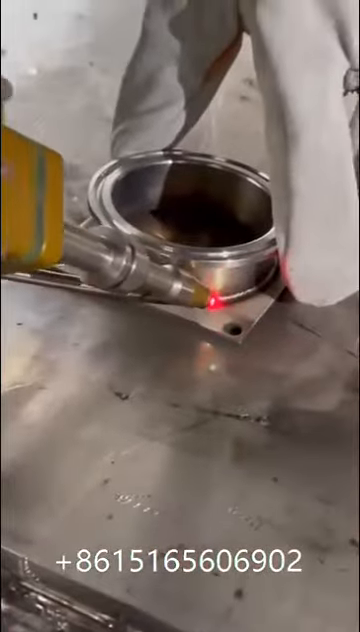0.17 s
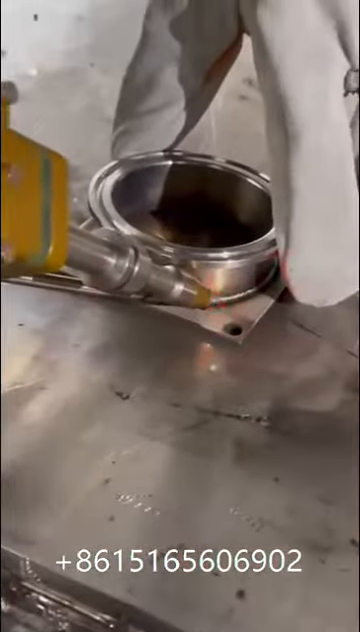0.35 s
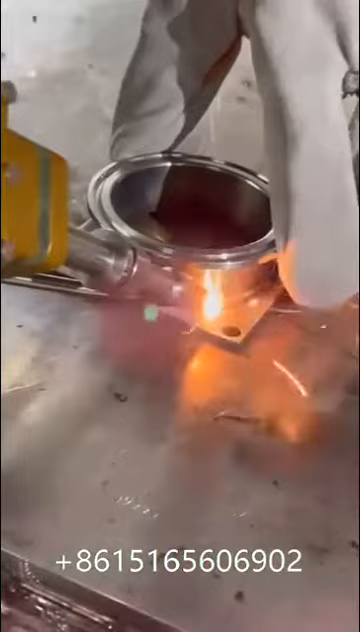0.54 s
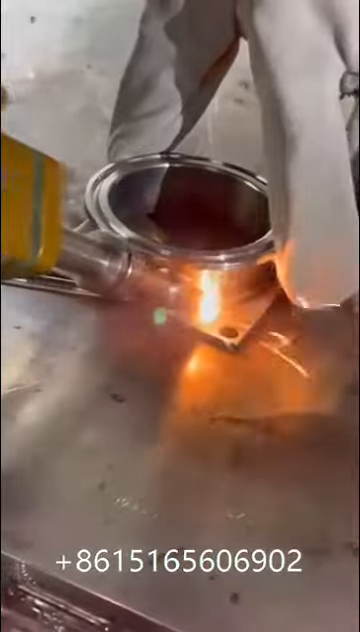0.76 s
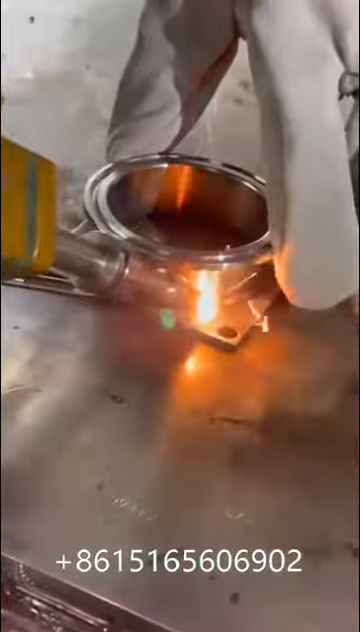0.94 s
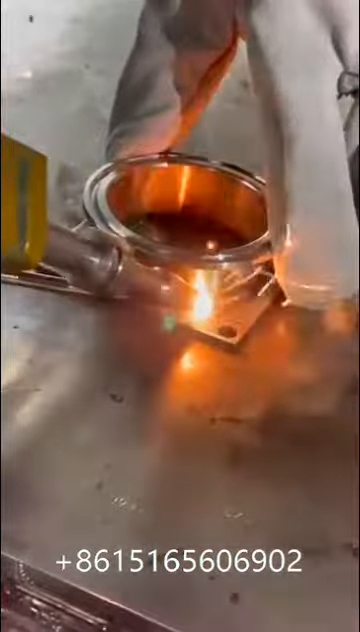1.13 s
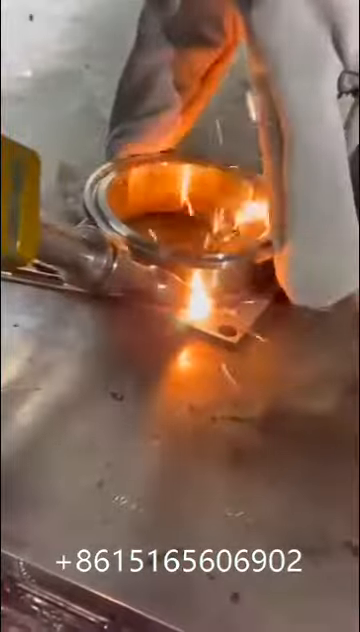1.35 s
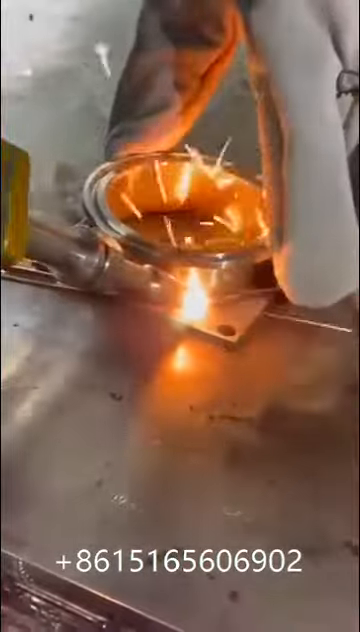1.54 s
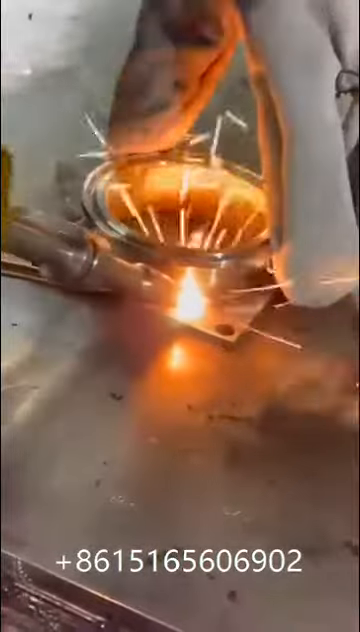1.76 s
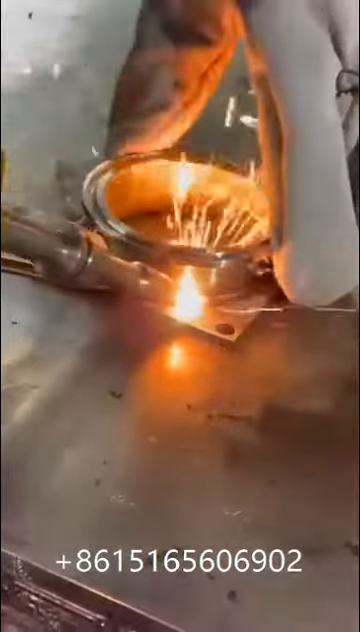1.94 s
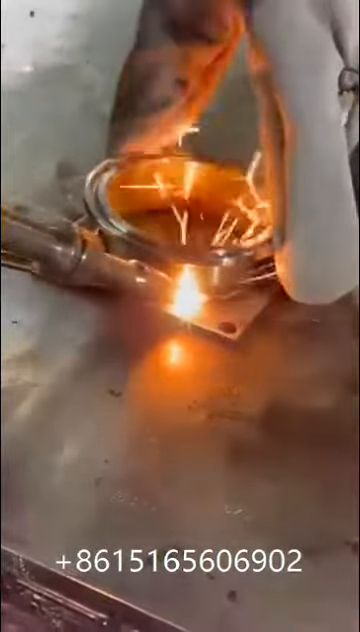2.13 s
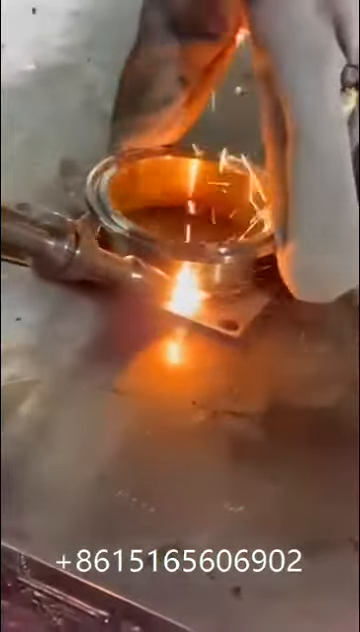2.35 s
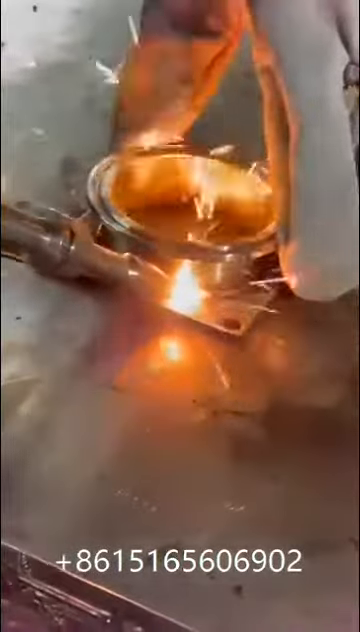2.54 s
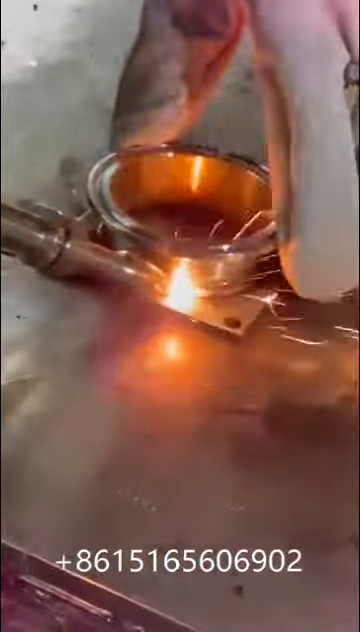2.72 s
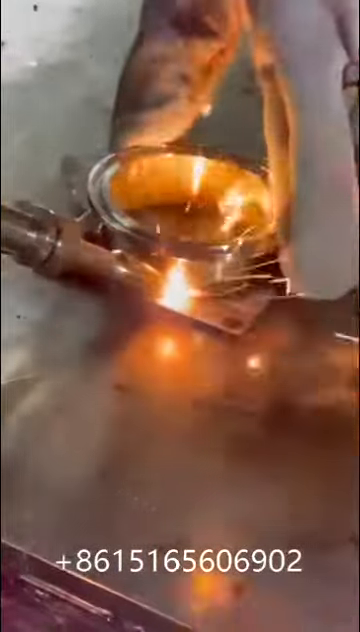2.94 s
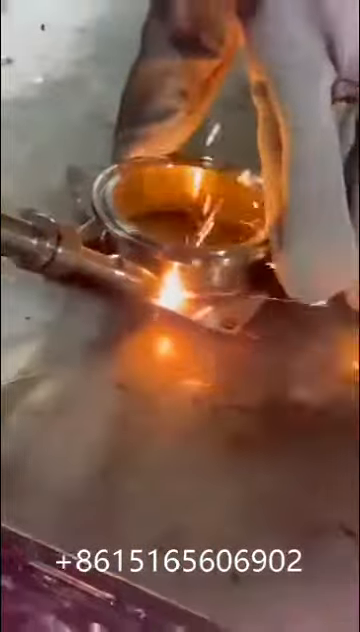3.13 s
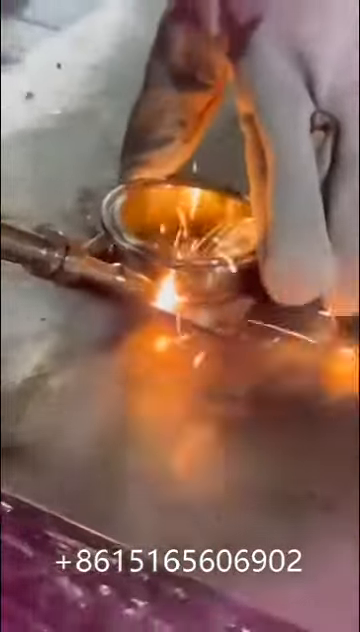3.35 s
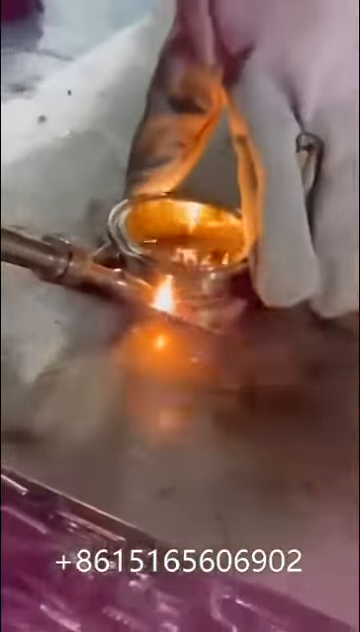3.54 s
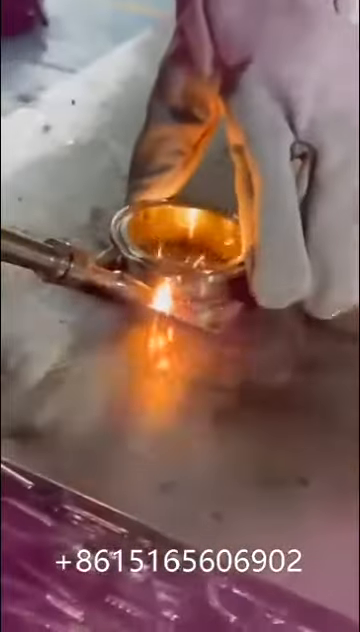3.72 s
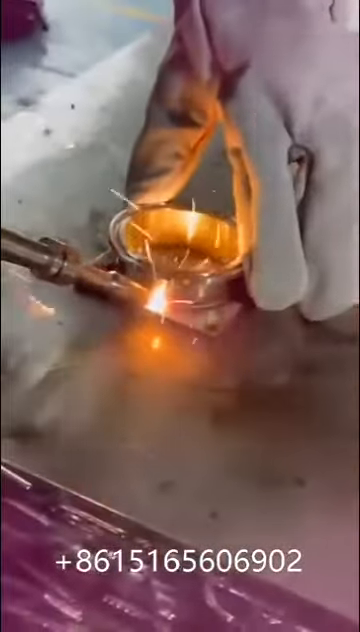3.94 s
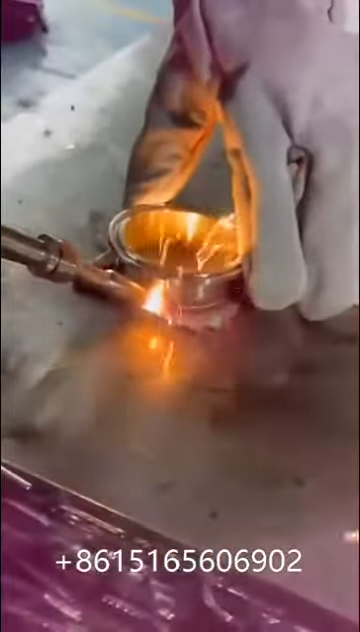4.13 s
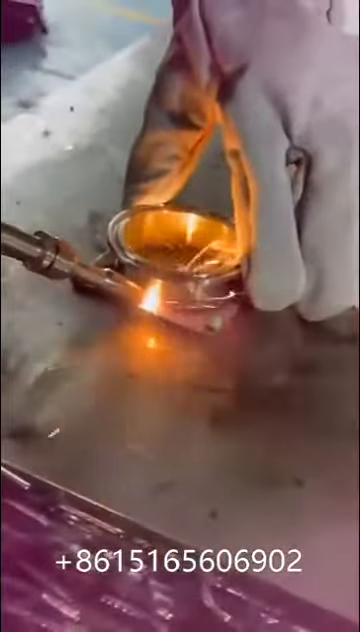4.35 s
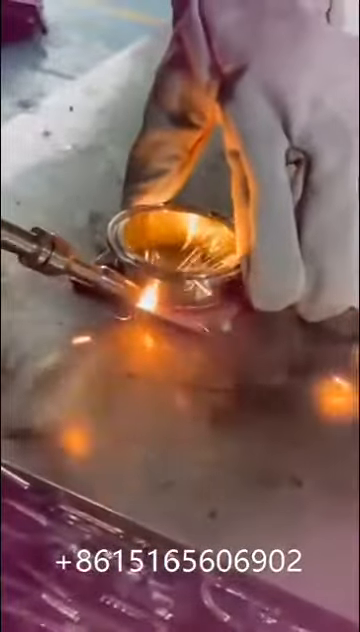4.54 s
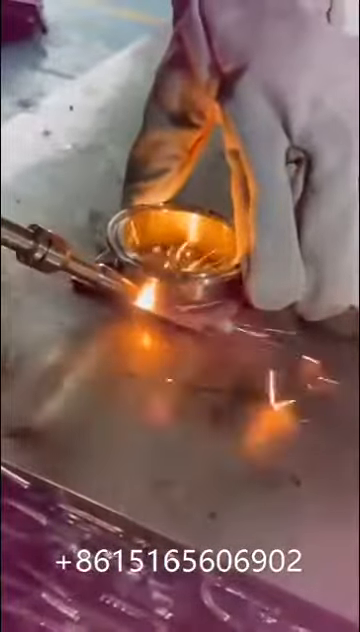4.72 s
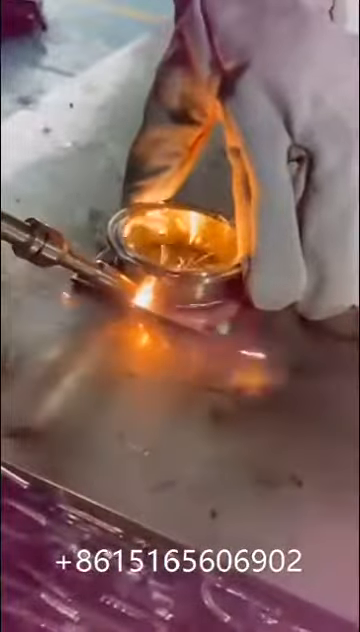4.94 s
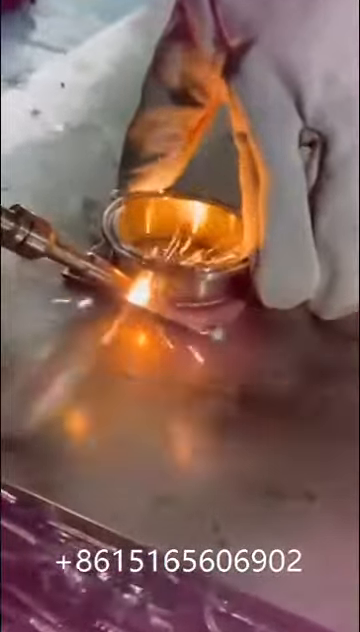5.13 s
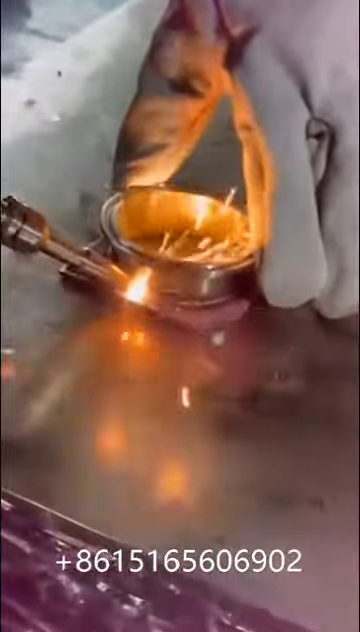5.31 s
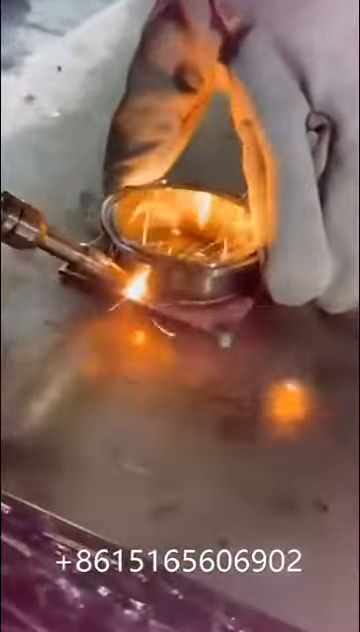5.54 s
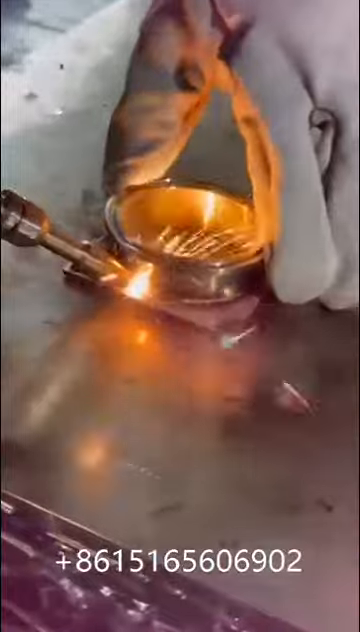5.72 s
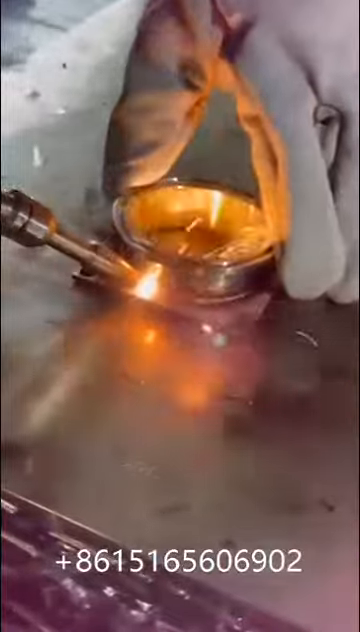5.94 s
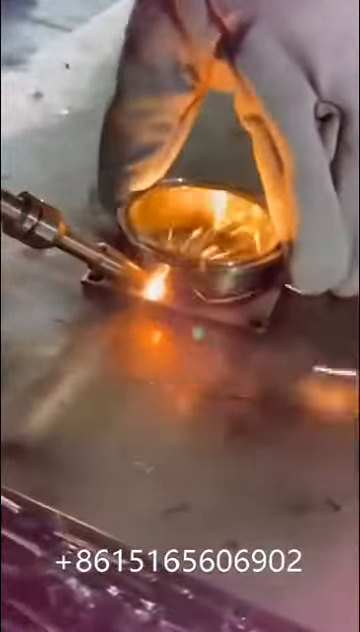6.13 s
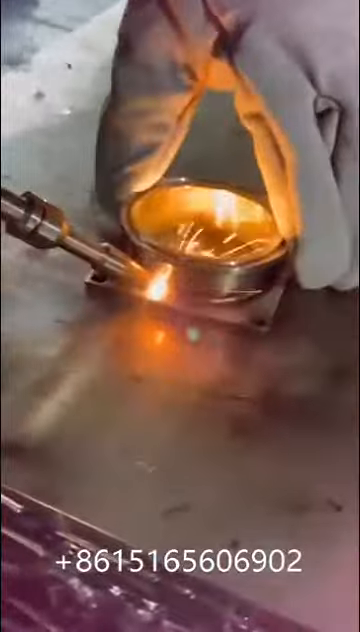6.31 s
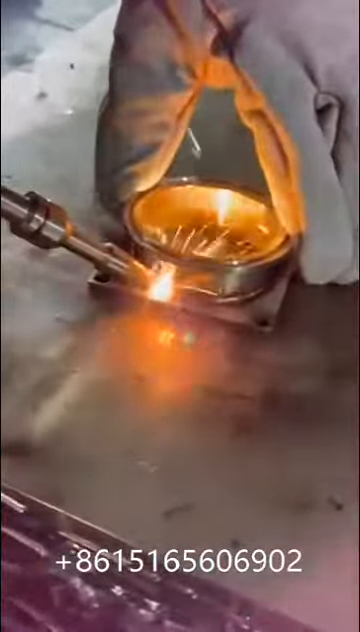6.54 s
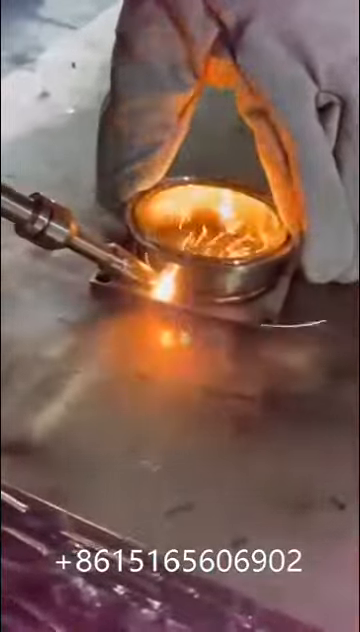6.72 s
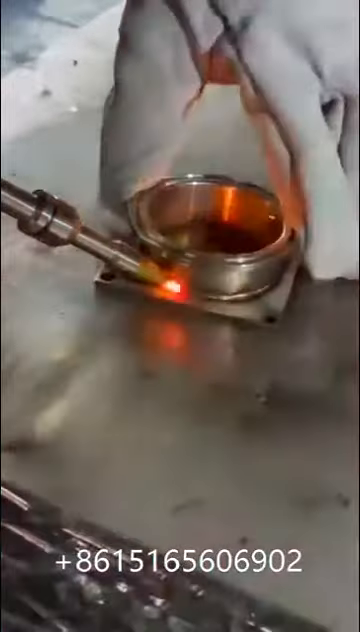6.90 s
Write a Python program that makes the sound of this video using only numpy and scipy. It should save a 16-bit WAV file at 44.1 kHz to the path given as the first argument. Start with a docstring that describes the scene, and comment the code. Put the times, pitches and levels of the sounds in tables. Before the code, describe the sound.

A harsh, buzzing hiss of a laser welder on stainless steel flares up over low workshop hum, falters briefly, then cuts off with a soft thud.

```python
"""The vapour plume of a handheld laser welder hisses and throbs along a seam in stainless steel, heard close by.
The beam swings to and fro: banded noise swells at each turn, with rings of a steel cup and a buzz at multiples
of the swing. The plume ramps up, sags once near the end and is cut off, with a low thud after it.
Behind it lies the workshop: broad bass-heavy noise, and two motors of nearly equal speed that beat.
In-step and opposed parts are summed and differenced into two microphone ports."""
import sys
import numpy as np
from scipy import signal
from scipy.fft import rfft, irfft, next_fast_len
from scipy.io import wavfile

SR = 44100
rng = np.random.default_rng(int(sys.argv[2]) if len(sys.argv) > 2 else 0)


def pcm_store(signal):
    """Save signal as 16-bit PCM."""
    levels = np.round(np.clip(np.atleast_2d(signal), -1, 1) * 32767)
    wavfile.write(sys.argv[1], SR, levels.astype(np.int16).T)


N = 311787
T = np.arange(N) / SR


def from_db(db):
    """Decibels to gain."""
    return 10 ** (np.asarray(db) / 20)


def rms_one(x):
    """Scales a signal to rms 1."""
    return x / np.sqrt(np.mean(x ** 2) + 1e-20)


def ramp(start_s, end_s):
    """0 before the start, 1 after the end, straight between."""
    return np.clip((T - start_s) / (end_s - start_s), 0, 1)


def between(values, times):
    """Moves from the first value to the second between two times."""
    return values[0] + (values[1] - values[0]) * ramp(*times)


def in_time(rows):
    """Turns the columns after t/s into automation curves."""
    s, *columns = np.transpose(rows)
    return [np.interp(T, s, c) for c in columns]


def at_hz(points, hz):
    """Reads a spectrum table on a log frequency axis."""
    point_hz, level_db = np.array(points).T
    return np.interp(np.log(hz + 1e-9), np.log(point_hz), level_db)


def drift(rate_hz):
    """Slow random wander, rms 1: noise at every 40th sample through two equal one-pole low-passes."""
    pole = np.exp(-80 * np.pi * rate_hz / SR)
    noise = rng.standard_normal(N // 40 + 2002)
    slow = signal.lfilter([1], [1, -2 * pole, pole * pole], noise)[2000:]   # run-in dropped
    return np.interp(np.arange(N) / 40, np.arange(len(slow)), rms_one(slow))


def coloured(in_step, opposed, ref_hz, bumps=()):
    """Spectra of an in-step and an opposed noise, scaled so the in-step one has rms 1 inside ref_hz."""
    size = next_fast_len(N)
    hz = np.fft.rfftfreq(size, 1 / SR)
    bumps_db = sum(db * np.exp(-((hz - mid_hz) / width_hz) ** 2) for mid_hz, width_hz, db in bumps)
    colour_db = np.array([at_hz(in_step, hz), at_hz(opposed, hz)]) + bumps_db
    spec = rfft(rng.standard_normal((2, N)), size) * from_db(colour_db)
    inside = (hz > ref_hz[0]) & (hz < ref_hz[1])
    return hz, spec * size / np.sqrt(2 * np.sum(np.abs(spec[0, inside]) ** 2)), size


def ports(pair):
    """Left is the sum of the in-step and opposed parts, right their difference."""
    in_step, opposed = pair
    return np.array([in_step + opposed, in_step - opposed])


# shop noise that reaches both ports in step: f/Hz, relative level per Hz/dB
SHOP_IN_STEP_SPECTRUM = [(25, -22), (45, -10), (68, 0), (110, -4), (145, -8), (200, -7.5), (300, -10),
                         (400, -13.5), (700, -21), (1200, -27), (2300, -28), (3600, -34), (4700, -34.5),
                         (5700, -33), (6500, -42), (8000, -36), (11000, -41), (13000, -47), (16000, -54)]
# shop noise that reaches the ports out of step: f/Hz, relative level per Hz/dB
SHOP_OPPOSED_SPECTRUM = [(25, -32), (60, -13), (150, -12), (300, -16), (500, -21), (1000, -29.5),
                         (4400, -39), (5100, -48), (6800, -34), (8500, -42), (16000, -52)]
# level ride on the bass under 130 Hz: t/s, level/dB
SHOP_BASS_RIDE = [(0, -0.5), (1.0, 1), (2.3, -3), (3.4, 2.5), (4.5, 1.5), (7.07, 2)]
# stereo width of the low noise, narrowing in mid seam: t/s, level of the opposed part/dB
SHOP_BASS_WIDTH = [(0, -2), (.9, -2), (1.25, 1), (1.7, -1), (2.3, -5), (2.7, -5), (3.0, -17), (3.4, -18),
                   (3.75, -10), (4.2, -14), (4.75, -8), (5.2, -10), (5.55, 2), (6.0, 0), (6.6, 0),
                   (6.85, 3), (7.07, 3)]
# the upper noise comes up a little around the cut
SHOP_RECOVERS_DB, SHOP_RECOVERS_S = 2, (6.73, 6.76)


def shop():
    """Fans and distant machines: bass-heavy noise, its low width in lumps, each upper band wavering alone."""
    hz, spec, size = coloured(SHOP_IN_STEP_SPECTRUM, SHOP_OPPOSED_SPECTRUM, ref_hz=(160, 500))
    edges = np.concatenate([[0, 130], np.geomspace(450, 16000, 13)])
    bass, low, *upper = (irfft(spec * (hz >= a) * (hz < b), size)[:, :N] for a, b in zip(edges, edges[1:]))
    bass_db, = in_time(SHOP_BASS_RIDE)
    width_db, = in_time(SHOP_BASS_WIDTH)
    lumpy_width = np.array([np.ones(N), from_db(width_db + 2.2 * drift(6))])
    low_noise = lumpy_width * (from_db(bass_db) * bass + from_db(1.8 * drift(8.0)) * low)
    upper_noise = sum(from_db(2.0 * drift(10)) * band for band in upper)
    upper_width = np.array([np.ones(N), from_db(.2 * width_db)])
    recovery = from_db(SHOP_RECOVERS_DB * ramp(*SHOP_RECOVERS_S))
    return ports(low_noise + upper_noise * upper_width * recovery)


MOTOR_HZ, IN_STEP_S = (70.67, 71.1), .52
# motor hum: multiple of the speed, relative level of the first motor/dB, of the second/dB
MOTOR_HUM = [(1, -48, -55), (2, -47, -46), (3, -63, -61), (4, -64, -58)]


def motors():
    """Two harmonic hums a fraction of a hertz apart swell and fade as they beat."""
    out = 0
    for k, *levels_db in MOTOR_HUM:
        for hz, level_db in zip(MOTOR_HZ, levels_db):
            out = out + from_db(level_db) * np.cos(2 * np.pi * k * hz * (T - IN_STEP_S) + k ** 2)
    return np.sqrt(2) * out


THUD_S, THUD_HZ, THUD_DB, THUD_T60_S = 6.7635, 105, -23, 0.0993


def thud():
    """A short low ring just after the beam stops: one sine with exponential decay."""
    after_s = np.maximum(T - THUD_S, 0)
    return from_db(THUD_DB - 60 * after_s / THUD_T60_S) * np.sin(2 * np.pi * THUD_HZ * after_s)


SWING_HZ, UNLIKE_S = 96.145, (2.33, 2.93)   # the two turns of the swing grow unlike between these times
MID_SEAM_S = (2.2, 2.7, 4.2, 5.6)   # the buzz takes on its mid-seam colour, then turns to its late one
# the buzz builds once the weld pool has formed, and fades before the end
BUZZ_START_DB, BUZZ_DB, BUZZ_GROWS_S = -61, -55.5, (1, 1.24)
BUZZ_END_DB, BUZZ_FADES_S = -7.5, (6.35, 6.47)
# buzz partials: multiple of the swing, relative level early/dB, in mid seam/dB, late/dB
BUZZ_PARTIALS = [(2, -16, -0.5, -2.5), (3, -6, -5, 1), (4, 0, 4, -4), (5, -4, 0.5, -5.5), (6, -0.5, -5, 1),
                 (7, -5, -0.5, -5), (8, -0.5, -1.5, 0.5), (9, -3, -2, -9), (10, -9, -8, -16),
                 (12, -19, -8.5, -1.5), (13, -8, -5, -15), (14, -7, -10.5, -5), (16, -8, -12, -3)]


def buzz():
    """Pressure pulses at both turns of the swing; odd multiples sound only as the two turns grow unlike."""
    out = 0
    for k, early_db, mid_db, late_db in BUZZ_PARTIALS:
        share = ramp(*UNLIKE_S) if k % 2 else 1
        waver = rng.uniform(0, 2 * np.pi) + 0.1 * k * drift(1.5)
        level_db = np.interp(T, MID_SEAM_S, [early_db, mid_db, mid_db, late_db]) + 3.0 * drift(3.5)
        out = out + share * from_db(level_db) * np.sin(2 * np.pi * k * SWING_HZ * T + waver)
    buzz_db = between((BUZZ_START_DB, BUZZ_DB), BUZZ_GROWS_S) + BUZZ_END_DB * ramp(*BUZZ_FADES_S)
    return np.sqrt(2) * from_db(buzz_db) * out


def cup_ring(ring_hz, width_hz):
    """Hiss resonating in the steel cup: low-passed noise pair shifted up to a centre that may move."""
    low_pass = signal.butter(2, width_hz / 2, fs=SR, output="sos")
    a, b = signal.sosfilt(low_pass, rng.standard_normal((2, N)))
    turn = 2 * np.pi * np.cumsum(ring_hz) / SR
    return rms_one(a * np.cos(turn) + b * np.sin(turn))


LOW_RING_HZ, HIGH_RING_HZ, RING_WIDTHS_HZ = 4990, 5950, (280, 280, 260)
# cup rings against the hiss as the gun passes round the cup:
# t/s, low ring level/dB, middle ring f/Hz, middle ring level/dB, high ring level/dB
CUP_RINGS = [(.45, -6, 5190, -7.5, -27), (1.3, -3.5, 5332, -9, -27), (1.7, -8, 5300, -9, -8),
             (2.1, -4.5, 5340, -4, -3.5), (2.6, -2, 5330, -4.5, -7), (3.0, -5, 5250, -3, -30),
             (3.8, -4.5, 5150, -11, -12), (4.1, -6, 5390, -17, -11), (4.4, -8.5, 5660, -27, -15),
             (4.8, -6, 5590, -6, -12), (5.2, -7, 5470, -4.5, -11), (6.0, -14, 5400, -6.5, -24),
             (6.3, -18, 5440, -6, -27), (6.64, -8, 5460, -6, -1), (6.69, -10, 5250, -1, -21),
             (6.74, -3, 5250, 5, -22)]


def cup_rings(throb_db):
    """Three resonances of the steel cup, throbbing with the plume; only the middle one glides."""
    low_db, middle_hz, middle_db, high_db = in_time(CUP_RINGS)
    centres_hz, levels_db = (LOW_RING_HZ, middle_hz, HIGH_RING_HZ), (low_db, middle_db, high_db)
    out = np.zeros(N)
    for ring_hz, ring_db, width_hz in zip(centres_hz, levels_db, RING_WIDTHS_HZ):
        gain = from_db(ring_db + throb_db + 0.39 * drift(19.7))
        out += gain * cup_ring(ring_hz * np.ones(N), width_hz)
    return out


TURN_SHARPNESS = 2.2
# each turn: place in the cycle, and throb in dB while the turns are alike and once they are unlike
FAR_TURN, FAR_THROB_DB, NEAR_TURN, NEAR_THROB_DB = 0.884, (4, 7.5), 0.43, (4, 3.5)


def turn_pulse(place):
    """A bump of height 1 each time the swing passes a place in its cycle."""
    return np.exp(TURN_SHARPNESS * (np.cos(2 * np.pi * (SWING_HZ * T - place)) - 1))


def throb():
    """Level swing of the vapour in dB: a swell at each end of the beam's travel, roughened by drift."""
    far_db = between(FAR_THROB_DB, UNLIKE_S) * turn_pulse(FAR_TURN)
    near_db = between(NEAR_THROB_DB, UNLIKE_S) * turn_pulse(NEAR_TURN)
    return far_db + near_db - np.mean(far_db + near_db) + 1.3 * drift(60)


# ride on the lower hiss: t/s, level under 2.3 kHz/dB, level near 3.5 kHz/dB
LOWER_HISS_RIDE = [(.45, -0.5, 2), (.95, -2, 3), (1.3, -2.5, 1.5), (2.0, -1.5, 2), (2.5, 1, 2), (2.8, 6, 1),
                   (3.6, 5, 0), (4.8, 3, 0), (5.6, 3, 1), (6.0, 2.5, -1), (6.4, 2.5, 0.5), (6.66, -1, 1.5),
                   (6.74, -1.5, 5)]
# ride on the treble: t/s, level near 11 kHz/dB, level near 15 kHz/dB
TREBLE_RIDE = [(.5, 3.5, -3), (.9, 4.5, 0), (1.3, 1, -5), (2.0, -2, 3), (2.8, 3, 6), (3.6, 3, 0.5),
               (4.8, 0, 6), (5.8, -1, 5), (6.3, -3, 3), (6.7, 0, 0)]
# opposed hiss against in-step hiss: t/s, level near 4 kHz/dB, level near 15 kHz/dB
HISS_WIDTH_RIDE = [(.45, 4, 3), (1.3, 5, 10), (2.5, -2, -13), (3.2, -5, 2), (4.5, -14, 2), (5.8, 1, -6),
                   (6.74, -1, 0.5)]


def hiss_colour(high_hz):
    """Level ride in dB, in-step and opposed, of the hiss band whose upper edge is high_hz."""
    roar_db, body_db = in_time(LOWER_HISS_RIDE)
    sheen_db, top_db = in_time(TREBLE_RIDE)
    wide_db, wide_top_db = in_time(HISS_WIDTH_RIDE)
    roar = np.interp(high_hz, [2300, 3900], [1, 0])
    body = np.interp(high_hz, [2300, 3000, 4300, 4700], [0, 1, 1, 0])
    sheen = np.interp(high_hz, [9500, 10500, 12500, 14000], [0, 1, 1, 0])
    top = np.interp(high_hz, [12500, 14000], [0, 1])
    wide = np.interp(high_hz, [3300, 3800, 5000, 5500], [0, 1, 1, 0])
    both_db = roar * roar_db + body * body_db + sheen * sheen_db + top * top_db
    return np.array([both_db, both_db + wide * wide_db + top * wide_top_db])


# hiss that reaches both ports in step: f/Hz, relative level per Hz/dB
HISS_IN_STEP_SPECTRUM = [(500, -20), (2600, -11), (3400, -10), (4100, -5), (6100, -2), (6800, -10),
                         (7100, -45), (8000, -45), (8300, -8), (9000, -2), (11400, -1), (12200, -6),
                         (13100, -2), (14300, 1), (14800, -1), (15400, 5)]
# hiss that reaches the ports out of step: f/Hz, relative level per Hz/dB
HISS_OPPOSED_SPECTRUM = [(500, -24), (2100, -26), (2700, -15), (3500, -24), (4300, -15), (4650, -16),
                         (4950, -42), (5500, -30), (5900, -4), (6800, 0), (8000, -2), (8800, -8),
                         (10100, -1), (10400, -3), (10900, -16), (12200, 1), (13200, -8), (14300, -4),
                         (15500, -12)]
# peaks and dips from echoes off the steel parts: f/Hz, width/Hz, level/dB
STEEL_ECHOES = [(1714, 114, -4), (4415, 56, -11), (2874.7, 285.7, 1), (9405.8, 246, 6.5),
                (9980, 244, -12.5), (12060, 99, -24), (13540, 280, -25)]
# strength of the plume along the seam: t/s, level/dB
PLUME_STRENGTH = [(.46, -33.5), (.96, -35), (1.3, -32), (1.6, -32), (2.06, -32), (2.35, -34.5),
                  (2.64, -35.5), (2.74, -39.5), (3.3, -38.5), (4.26, -37), (5.1, -38.5), (5.6, -37.5),
                  (5.8, -36), (6.0, -36), (6.3, -34), (6.62, -32.5), (6.67, -32.5), (6.72, -33)]


def plume():
    """Turbulent vapour: noise in bands that throb with the swing and flicker on their own, plus cup rings."""
    throb_db = throb()
    hz, spec, size = coloured(HISS_IN_STEP_SPECTRUM, HISS_OPPOSED_SPECTRUM, (2000, 6300), STEEL_ECHOES)
    edges = np.concatenate([[0], np.geomspace(600, 16000, 45)])
    out = np.zeros((2, N))
    for low, high in zip(edges, edges[1:]):
        band = irfft(spec * ((hz >= low) & (hz < high)), size)[:, :N]
        depth = np.interp(high, [1500, 4000, 12000], [.2, .9, .55])   # throb deepest near 4 kHz
        flicker_db = np.interp(high, [1000, 2500, 6000, 9000, 13000], [2.2, 2.2, 1.6, 2.9, 2.4])
        flicker = flicker_db * np.array([drift(17.4), drift(10)])
        out += band * from_db(hiss_colour(high) + depth * throb_db + flicker)
    out[0] += cup_rings(throb_db)
    strength_db, = in_time(PLUME_STRENGTH)
    return from_db(strength_db) * ports(out)


IGNITE_S, RAMP_S, RAMP_POWER = 0.3, 0.18, 1.7   # the beam fires and its power ramps up
# the plume sags once just before the end, then catches again
FALTER_S, FALTER_FADE_S, FALTER_DB, CATCH_S = 6.654, .04, -11, .012
CUT_S, CUT_DB_PER_S = 6.739, 1700   # the trigger is released and the plume collapses
TAIL_DB, TAIL_DB_PER_S = -13, 550   # the room rings out after the cut


def firing():
    """Gain of the beam: ramp up, one falter, sudden cut with a short tail."""
    falter = ramp(FALTER_S - FALTER_FADE_S, FALTER_S) - ramp(FALTER_S, FALTER_S + CATCH_S)
    after_s = np.maximum(T - CUT_S, 0)
    tail_db = TAIL_DB - TAIL_DB_PER_S * after_s
    cut_db = np.where(after_s > 0, np.maximum(-CUT_DB_PER_S * after_s, tail_db), 0)
    return ramp(IGNITE_S, IGNITE_S + RAMP_S) ** RAMP_POWER * from_db(FALTER_DB * falter + cut_db)


SHOP_DB, MOTORS_DB = -42.5, 0.5   # background faders
# the whole scene drops in level, then creeps part of the way back
DROP_S, DROP_LENGTH_S, DROP_DB, SETTLE_DB, RETURN_S = 0.95, 0.14, -5, -3, 1.2


def scene():
    """Plume and buzz sound while the beam fires, over the shop and its motors."""
    background = from_db(SHOP_DB) * shop() + from_db(MOTORS_DB) * motors()
    weld = firing() * (plume() + buzz())
    creep_db = SETTLE_DB + (DROP_DB - SETTLE_DB) * np.exp((DROP_S - T) / RETURN_S)
    drop_db = ramp(DROP_S, DROP_S + DROP_LENGTH_S) * creep_db
    return from_db(drop_db) * (weld + thud() + background)


def record(dry):
    """Cuts the top steeply above 15.6 kHz with an elliptic low-pass."""
    return signal.sosfilt(signal.ellip(12, .5, 80, 15600, fs=SR, output="sos"), dry)


dry = scene()
out = record(dry)
pcm_store(out)
```